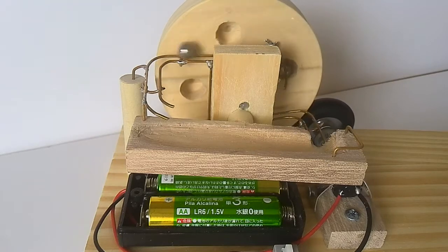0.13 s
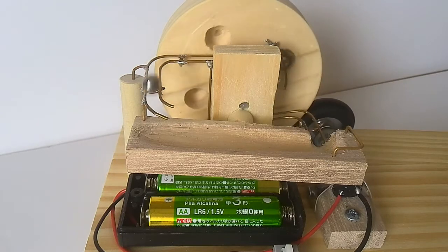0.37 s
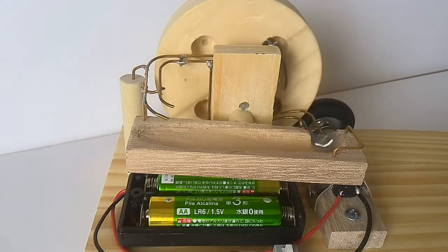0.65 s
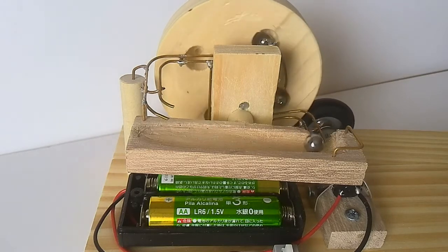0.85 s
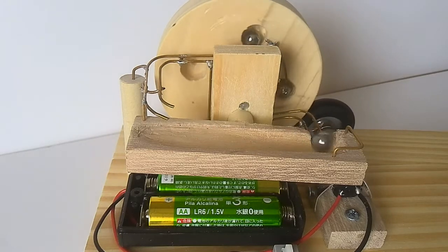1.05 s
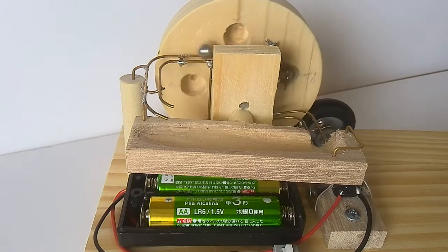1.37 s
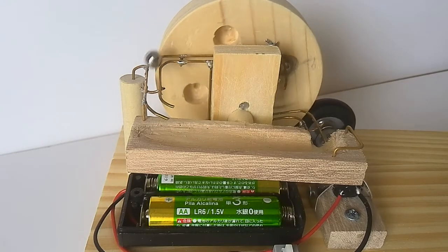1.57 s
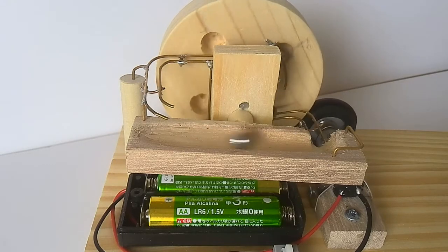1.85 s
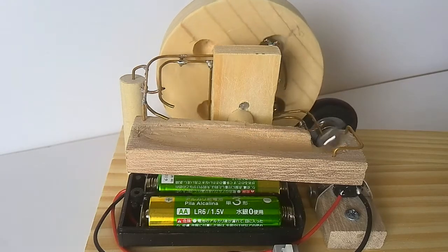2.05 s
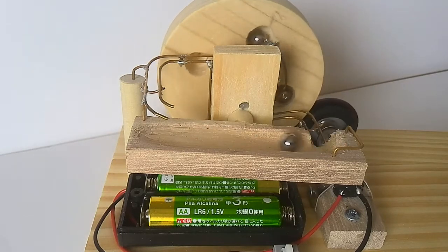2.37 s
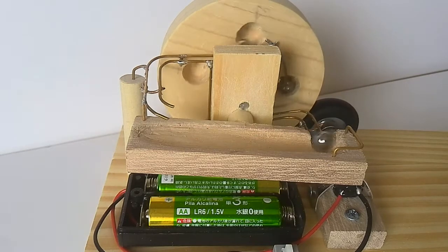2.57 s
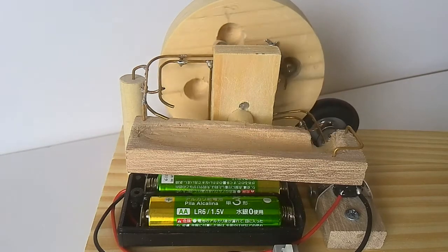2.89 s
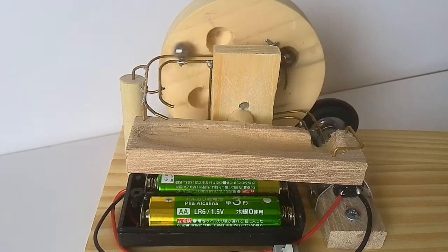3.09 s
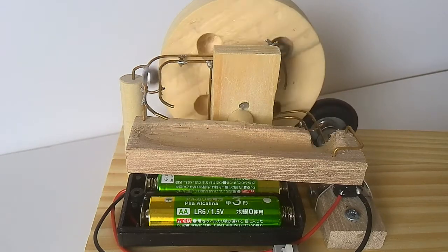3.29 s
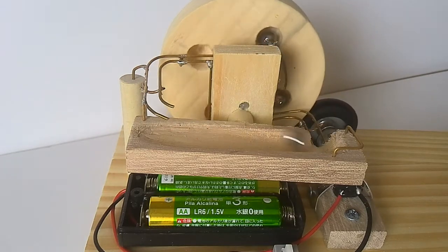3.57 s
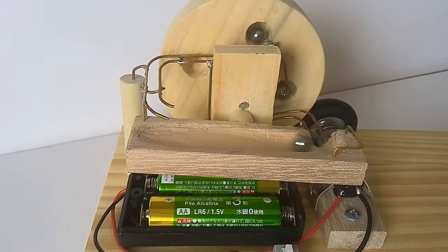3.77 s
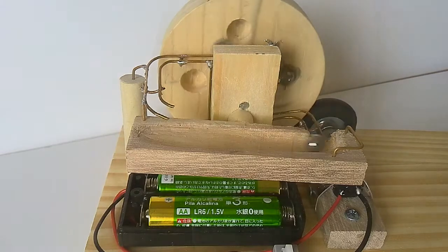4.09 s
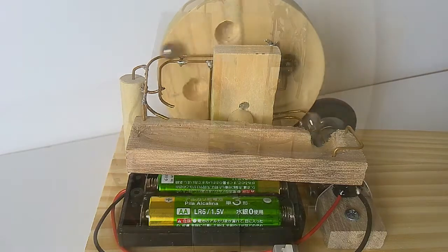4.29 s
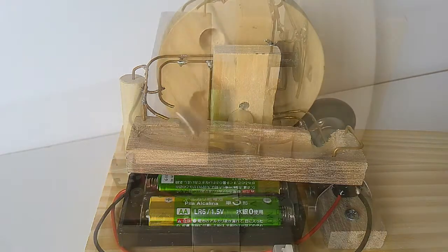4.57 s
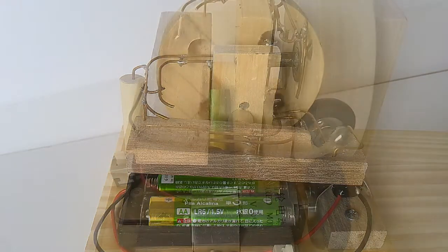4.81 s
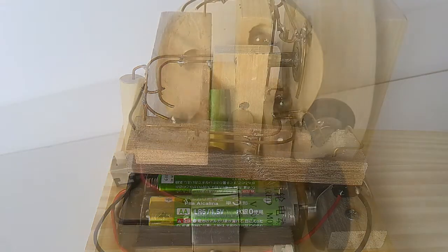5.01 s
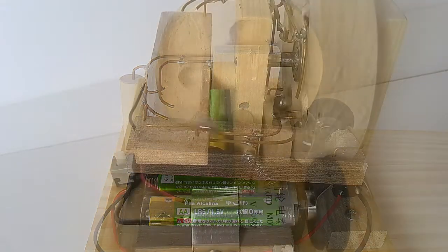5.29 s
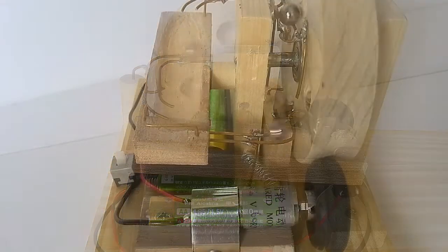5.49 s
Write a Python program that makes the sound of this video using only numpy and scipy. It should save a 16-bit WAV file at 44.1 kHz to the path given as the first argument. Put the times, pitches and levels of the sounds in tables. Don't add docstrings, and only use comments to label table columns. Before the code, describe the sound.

Over low room tone and a steady high motor hiss with faint gear whirr, metal balls make dry wooden ticks, clacks and tinny wire rattles, lap after lap. Faint rolling joins the knocks. Strong hits fall about one and a half, two, three, three and a half and four seconds in, then busy clattering to the end. Close stereo pickup, brighter on the left, little echo.

```python
import sys
import numpy as np
from scipy import signal
from scipy.fft import rfft, irfft, next_fast_len
from scipy.io import wavfile
from scipy.ndimage import uniform_filter1d, map_coordinates

SR = 44100
rng = np.random.default_rng(int(sys.argv[2]) if len(sys.argv) > 2 else 0)


def elevation(decibels):
    levels = np.asarray(decibels, float)
    return 10 ** (levels / 20)


def store_pcm(level_fs):
    pcm = np.round(np.clip(level_fs, -1, 1) * 32767).astype(np.int16)
    wavfile.write(sys.argv[1], SR, np.atleast_2d(pcm).T)


N = 249165

# f/Hz, level per Hz/dB
ROOM_TONE = [(9, -54), (15, -4.5), (60, -20), (100, -12.5), (210, -19.5), (270, -18), (340, -19),
             (430, -27.5), (680, -38.5), (800, -29), (1900, -28.5), (3000, -21), (3900, -29), (6600, -120)]
# f/Hz, left-right likeness/1
COHERENCE = [(60, .999), (100, 0.92), (150, 1), (400, 0.045), (1500, 0.063), (3000, 0.029)]
# f/Hz, width/Hz, level/dB
DISTANT_DRONE = [(34.8, 8, -61), (53.4, 5.4, -64)]
# f/Hz, t60/s
REVERBERATION = [(500, 0.21), (2500, 0.079), (8000, 0.047)]

# f/Hz, level/dB
STEADY_SHADE = [(200, 2.5), (1000, -0.5), (2500, 6), (4500, 1.5), (8000, 10), (10000, 15), (14000, 13)]
# f/Hz, level/dB
WOOD_SHADOW = [(900, 5), (1300, 6), (1800, 0), (2550, 5), (3400, 5), (4200, 10), (5000, 7), (6500, 11)]
# f/Hz, level/dB
RAIL_SHADOW = [(1000, 1), (2500, 2), (3700, 4), (5800, 5), (6800, 15), (10000, 17), (13000, 12)]

# t/s, level/dB
MOTOR_LOAD = [(0.0, -43), (0.83, -44.5), (1.05, -42), (1.64, -43.5), (2.47, -43), (2.97, -44), (3.9, -43),
              (4.28, -43.5), (5.11, -42.5), (5.44, -40.5), (5.65, -38.5)]
# f/Hz, width/Hz, level/dB
CAN_PEAKS = [(8590, 212, 3), (8750, 74, -2), (9150, 230, 2.5), (9580, 170, 2), (9990, 260, 3.5),
             (10500, 90, -1), (10334, 100, 4), (11440, 140, -2.5), (11910, 80, 1), (12170, 88, -4),
             (8870, 61, 2.5), (12350, 280, -5), (13830, 150, -8.5), (7460, 290, -13)]
# f/Hz, width/Hz, level/dB
GEAR_PEAKS = [(2970, 95, 1), (5040, 170, 4.5), (3790, 540, -4.5), (5510, 590, 3), (5130, 130, -2.5),
              (6640, 110, -24)]
# t/s, level/dB
LATE_HISS = [
    (0, -85.5),
    (4.3, -79),
    (4.55, -53),
    (4.9, -45),
    (5.3, -42.5),
    (5.65, -45),
]
# f/Hz, width/Hz, level/dB
LATE_HISS_PEAKS = [(8200, 420, -3), (8750, 240, -16.5), (10300, 310, 2), (10750, 260, -0.5),
                   (10800, 190, -3), (12000, 400, -3)]

# t/s, level/dB, attack/s, hold/s, t60/s
DRAGS = [
    (.443, -45, .01, .06, .2),
    (.07, -58, .02, .06, .2),
]
# f/Hz, level per Hz/dB
TABLE_TOP = [(90, -30), (150, -13), (220, -15), (480, -10), (1000, -9), (2500, -17), (4000, -24),
             (6000, -60)]
# f/Hz, width/Hz, level/dB
TABLE_BENDING = [(328, 53, -1)]

# from t/s, to t/s, level/dB
WOOD_ROLLS = [
    (-.1, .42, -60.5),
    (.62, 1.1, -64.5),
    (1.2, 2.27, -60),
    (2.6, 3.85, -65),
    (4.22, 4.6, -59.5),
    (4.6, 5.0, -56.5),
    (5.0, 5.7, -58.5),
]
# from t/s, to t/s, level/dB
RAIL_SLIDES = [
    (-.1, .42, -58.5),
    (.42, .6, -55),
    (1.2, 2.0, -57),
    (2.3, 3.0, -60.5),
    (3.1, 4.2, -59.5),
    (4.3, 4.9, -54.5),
    (4.9, 5.7, -57.5),
]
# t/s, level/dB, t60/s
SKITTERS = [(.07, -58, 0.29), (0.767, -32, 0.02), (.96, -58, 0.065), (1.261, -53, 0.11), (2.055, -52, 0.13),
            (2.19, -49.5, 0.075), (2.631, -46, 0.38), (3.051, -53, 0.41), (3.715, -44.5, 0.1),
            (4.831, -50, 0.17), (4.935, -45, 0.074), (5.282, -51, 0.33), (5.499, -61, 0.69)]

# f/Hz, level/dB, t60/s
BASE_MODES = [(1342, 4.5, .0057), (1509, -19, .024), (1025, -15, .02), (1652, -18, .02), (3350, -3, .005)]
# f/Hz, level/dB, t60/s
WALL_MODES = [(2110, -16, .018), (2546, -14, .03), (2550, 3, .007), (2800, -15, .018), (3105, -10, .035),
              (3240, -13, .03), (3368, -11, .045)]
# f/Hz, level/dB, t60/s
WHEEL_MODES = [(4250, -1, .006), (4420, -1, .013), (3930, -17, .025), (5100, -7, .01)]
# f/Hz, level/dB, t60/s
GRAIN_MODES = [(5740, -16, 0.027), (5410, 12, 0.0044), (6560, -8, 0.05)]
# f/Hz, level/dB, t60/s
FRAME_MODES = [(1600, 0, 0.0049), (2066, -6, 0.03), (2620, 6, 0.0065), (3150, 0, .02)]
# f/Hz, level/dB, t60/s
CRACK_MODES = [(1200, -8, .003), (2000, -4, .003), (2900, -3, .003), (3800, -3, .0035)]
# f/Hz, level/dB, t60/s
CAVITY_MODES = [(875, -1, .05), (800, -2, .007)]
# f/Hz, level/dB, t60/s
THUMP_MODES = [(159.5, 12.5, 0.083), (327, 20.5, 0.019), (442, 14, 0.02)]
# f/Hz, level/dB, t60/s
SHORT_SPANS = [(6180, -15, 0.038), (6715, -10, 0.034), (7166, -4, 0.025), (7560, -4, 0.0091),
               (7800, -24, 0.008), (8794, -13, 0.035), (9520, -14, 0.021), (10140, -14, 0.014)]
# f/Hz, level/dB, t60/s
LONG_SPANS = [(3070, -11, .026), (3370, -6, .045), (3892, -6, .045), (4370, -2, .02), (4860, -4, .024),
              (5500, -8, .016), (2300, -14, .016), (1500, -14, .014)]
# f/Hz, level/dB, t60/s
BALL_MODES = [(10470, 2, 0.013), (11570, 8.5, 0.0052), (13330, 0, 0.012)]

# t/s, level/dB, hardness/dB
BASE_THUDS = [(0.063, -32.5, -24), (0.0865, -32, -29), (0.0974, -30.5, -8), (0.803, -39, -10),
              (1.2754, -29.5, -8), (1.3528, -34, -18), (1.5673, -33, -1), (1.631, -24, -10),
              (2.6305, -27.5, -9), (2.683, -37, -17), (2.694, -40, -20), (2.7118, -33.5, -17),
              (2.7251, -38, -20), (3.126, -22, -1.5), (3.1585, -44, -15), (3.684, -45, -5),
              (3.7048, -39, -6), (3.712, -38, -15), (3.75, -47, 1), (3.717, -43, -15), (4.6872, -23.5, 0),
              (4.7094, -30, -18), (5.4299, -37.5, -29), (5.4985, -25, -10), (.876, -41, -10),
              (1.655, -46, -22), (2.194, -53, 0), (2.65, -28, -16), (2.983, -40.5, -24), (5.013, -42, -18),
              (5.168, -47, -10), (5.282, -30.5, -8), (5.296, -32, -8), (0.396, -39, -29), (0.418, -38, -20),
              (0.844, -57, -12), (1.975, -44.5, -12), (1.987, -50, -12), (3.327, -43, -25),
              (4.945, -51, -15), (4.885, -47, -14), (4.49, -46, -19), (0.454, -52, -30), (0.468, -44, -24),
              (.508, -30, -6), (0.534, -39, -10), (2.6765, -42, -10), (2.757, -43, -12), (5.511, -37, -12),
              (5.525, -33, -10), (5.5472, -37, -14), (5.557, -36.5, -14), (5.573, -36, -17),
              (5.5864, -39, -14)]
# t/s, level/dB, push into the base/dB, hardness/dB
TROUGH_TAPS = [(.608, -22.5, 0, -17), (.628, -33, -3, -7), (0.7549, -26, -10, -0.5), (.763, -22, -10, -34),
               (0.7718, -44, -6, -22), (1.077, -45.5, -3, -14), (1.9182, -51, 3, -10), (3.555, -42, 4, -8),
               (0.888, -36.5, -6, -18), (0.9548, -32.5, -8.5, -23), (0.964, -44.5, -2, -19),
               (1.04, -39, -13, -3), (1.9106, -19, -5.5, -1.5), (1.953, -37.5, 2, -22),
               (2.0543, -49, 3, -7), (2.057, -33.5, -15, -21), (2.0691, -42, -9, -8),
               (2.0767, -36.5, -5.5, -4), (2.1086, -44, 2, -13), (2.1863, -29, -15, -6),
               (2.221, -28, -15, -34), (3.5457, -16, -8, -1.5), (3.5903, -37, 2.5, -18),
               (3.8068, -34, -4.5, -6), (4.282, -34.5, -13, -8), (4.6918, -18, -5.5, -14),
               (4.8364, -24.5, -19, -25), (4.85, -25.5, -12, -8), (4.9309, -32.5, -9, -15),
               (4.8948, -38, -9, -22), (5.1712, -41, -12, -15), (5.184, -43, -26, -15),
               (4.9534, -38, -1, -21), (5.076, -38, -8, -12), (5.0895, -45, 1, -16), (5.125, -37, -31, -5),
               (5.4725, -37, -7, -22)]
# t/s, level/dB, push into the frame/dB
WHEEL_CLACKS = [(0.0224, -28.5, -6), (1.257, -36, -10), (1.5334, -38, -22), (1.5634, -27, -7),
                (1.59, -38, -4), (1.8377, -36, -24), (2.615, -43.5, -18), (2.6768, -45.5, -1),
                (3.03, -42, -25), (3.0506, -36, -10), (3.059, -24.5, -6), (3.084, -39, -10),
                (3.4575, -45, -13), (3.577, -47, -16), (4.3457, -40.5, -13), (4.6223, -24.5, -10),
                (4.629, -44, -6), (4.641, -38, -16), (4.6457, -43, 1), (4.829, -36.5, -21),
                (4.895, -43, -14), (5.518, -37, -20.5)]
# t/s, level/dB, long spans over short/dB
RAIL_CLINKS = [(0.1507, -33, 4.5), (0.1811, -35, -16), (0.5103, -33.5, -3), (1.2275, -30, -9),
               (1.2446, -21.5, -14.5), (1.2672, -26, -7.5), (1.2796, -37, 1), (1.2856, -30, -11),
               (1.464, -33.5, 2.5), (1.489, -32.5, -9), (1.498, -38, -7), (1.505, -36, -2),
               (1.571, -27.5, -10), (1.5751, -47, -13), (1.809, -36, -8), (1.8135, -33, -5),
               (1.82, -37, -4), (1.8224, -37, 2), (1.827, -38, 0), (1.84, -38, 3), (2.626, -29, -10),
               (2.6332, -33, -16), (2.6376, -30, -8), (2.645, -36, -6), (2.649, -31, -9),
               (2.6537, -31, -4), (2.6593, -30, -13), (2.667, -25, -20), (3.051, -34, -1),
               (3.0656, -32.5, 4), (3.17, -35, -3),
               (3.448, -30.5, -6), (3.474, -34.5, -6), (3.9948, -16.5, -6), (3.9974, -15, -5.5),
                (4.0142, -21, -9.5), (4.028, -35, -2.5), (4.232, -34.5, 4), (4.2366, -40, -12),
                (4.2704, -33, -3.5), (4.336, -36.5, -3), (4.3577, -33, -8), (4.4354, -37, -2),
                (4.59, -37, -5), (4.5924, -40, -9), (4.5957, -31, 0), (4.6, -36, -3), (4.6175, -28.5, -2),
                (4.861, -37, -11), (5.2817, -21, -12), (5.29, -21, -4.5), (5.295, -25, -18),
                (5.2994, -26.5, -2), (5.307, -36, -8), (5.3125, -25, -12), (5.3178, -37, -5),
                (5.325, -40, 0), (5.4863, -44, -7), (5.4925, -34, -12), (5.5033, -29, -6),
                (5.5144, -32, -4), (5.523, -33, -3), (5.528, -28, -4), (5.5764, -40, -12),
                (5.5837, -34, -8),
               (.002, -37.5, -4), (0.098, -42, -15), (.272, -36.5, -3), (0.3745, -38.5, -2.5),
                 (.444, -54, -30), (0.5068, -37, -3), (.5345, -37, 4.5), (1.2502, -33, 4), (1.258, -31, -2),
                 (2.61, -42, -9), (2.677, -41, -21), (2.747, -40, -12), (3.0305, -53, -8),
                 (3.082, -45, -22), (3.443, -38, -3), (3.4725, -37, 6), (4.021, -31, 5),
                 (4.3745, -35.5, -10), (4.655, -36, -6), (5.335, -42, -15), (5.537, -35, -7),
                 (5.56, -35.5, -10)]


def unit(x):
    return x / np.sqrt(np.mean(x ** 2) + 1e-20)


def along(points, hz):
    f, v = np.transpose(points)
    return np.interp(np.log(hz + 1), np.log(f + 1), v)


def curves(rows):
    s, *cols = np.transpose(rows)
    return [np.interp(np.arange(N) / SR, s, c, -120, c[-1]) for c in cols]


def spans(rows):
    t = np.arange(N) / SR
    ease_s = 0.013
    return sum(elevation(db) * np.clip(np.minimum(t - a, b - t) / ease_s + .5, 0, 1) for a, b, db in rows)


def wobble(rate):
    knots = rng.standard_normal(int(N * rate / SR) + 4)
    return map_coordinates(knots, [np.arange(N) * rate / SR])


def pair(alike):
    a, b = rng.standard_normal((2, N))
    u = np.arccos(np.clip(alike, 0, 1)) / 2
    return np.array([np.cos(u) * a + np.sin(u) * b, np.cos(u) * a - np.sin(u) * b])


def filtered(x, response):
    m = next_fast_len(N + 8192)
    return irfft(rfft(x, m) * response(np.fft.rfftfreq(m, 1 / SR)), m)[..., :N]


def resonant(peaks):
    def response(f):
        total = 0
        for k, (c, w, db) in enumerate(peaks):
            total = total + (-1) ** k * elevation(db) * 1j * f * w / (c * c - f * f + 1j * f * w)
        return total
    return response


def spread(peaks):
    return lambda hz: np.sqrt(sum(abs(resonant([peak])(hz)) ** 2 for peak in peaks))


def damped(modes, widen):
    return resonant([(hz, widen * np.log(1000) / np.pi / t60, db) for hz, db, t60 in modes])


def patchy(x, depth_db, size=14):
    z = signal.stft(x, nperseg=512)[2]
    field = uniform_filter1d(rng.standard_normal(z.shape[1:]), size=3, axis=0)
    field = uniform_filter1d(field, size=size, axis=1)
    return signal.istft(z * elevation(depth_db * unit(field)), nperseg=512)[1][:, :N]


def air():
    def mid_side(hz):
        turn = np.arccos(np.clip(along(COHERENCE, hz), 0, 1)) / 2
        return elevation(along(ROOM_TONE, hz)) * [np.cos(turn), np.sin(turn)]
    mid, side = filtered(rng.standard_normal((2, N)), mid_side)
    tone = elevation(-59.0) * unit(np.array([mid + side, mid - side]))
    for hz, width, db in DISTANT_DRONE:
        tone = tone + elevation(db) * unit(filtered(rng.standard_normal(N), resonant([(hz, width, 0)])))
    return tone


def room(x):
    wall_s = .005
    delay = round(wall_s * SR)
    out, step = np.zeros((2, N + SR)), SR // 8
    for start in range(0, N, step):
        hz, t, z = signal.stft(rng.standard_normal((2, SR // 6)), SR, nperseg=128)
        decay = elevation(-60 * t / along(REVERBERATION, hz)[:, None])
        tail = signal.istft(z * decay, SR, nperseg=128)[1]
        echo = signal.fftconvolve(x[None, start:start + step], tail / np.linalg.norm(tail[0]), axes=1)
        out[:, start + delay:][:, :echo.shape[1]] += echo
    return out[:, :N]


def scuff():
    t = np.arange(N) / SR
    stroke = 0
    for s, db, attack, hold, t60 in DRAGS:
        fade = elevation(db - 60 * np.clip(t - s - hold, 0, 1) / t60)
        stroke = stroke + np.clip((t - s) / attack, 0, 1) * fade
    rough = elevation(2.2 * wobble(250) + 1.2 * wobble(70)) * pair(.75)
    body = lambda hz: elevation(along(TABLE_TOP, hz)) + abs(resonant(TABLE_BENDING)(hz)) ** 2
    return stroke * unit(filtered(rough, body))


def motor():
    hiss_db, = curves(MOTOR_LOAD)
    late_db, = curves(LATE_HISS)
    shaft = np.sin(2 * np.pi * np.cumsum(60 + 4 * wobble(4.2)) / SR)
    chatter = elevation(0.93 * shaft + 0.33 * wobble(400) + 0.81 * wobble(24.89) + 0.46 * wobble(2500))
    can = unit(patchy(filtered(chatter * pair(0.029), spread(CAN_PEAKS)), depth_db=1.34, size=90))
    late_hiss = unit(filtered(chatter * pair(0.52), lambda hz: spread(LATE_HISS_PEAKS)(hz) ** 1.4))
    gears = unit(patchy(filtered(chatter * pair(0.47), resonant(GEAR_PEAKS)), depth_db=3.0))
    whirr_db = -51 + 0.74 * (hiss_db - hiss_db.mean())
    return elevation(hiss_db + 0.14) * can + elevation(late_db) * late_hiss + elevation(whirr_db) * gears


def rolling():
    t = np.arange(N) / SR
    trails = sum(elevation(db - 60 * np.abs(t - s) / t60) * (t > s) for s, db, t60 in SKITTERS)
    bumps = lambda: elevation(3.9 * wobble(150) + 1.6 * wobble(33)) * pair(0.025)
    wood = unit(filtered(bumps(), damped(BASE_MODES + WALL_MODES, widen=3.6)))
    wire = filtered(bumps(), damped(SHORT_SPANS[1:3] + LONG_SPANS[:5], widen=2.7))
    wire = unit(patchy(wire, depth_db=3.0))
    return (spans(WOOD_ROLLS) + trails) * wood + spans(RAIL_SLIDES) * wire


def strikes(times, levels_db, modes, rise_s=0, scatter_db=1.7):
    damping = 1.2
    hz, db, t60 = np.transpose(modes)[:, :, None]
    out = np.zeros(N + SR)
    t = np.arange(min(int(t60.max() / damping * SR), SR // 10)) / SR
    shape = elevation(db - 60 * damping * t / t60) * (1 - np.exp(-t / (rise_s + 0.7 / hz)))
    detune = .012 + 5e-7 / t60 ** 2
    luck = rng.standard_normal((len(times), 3, len(modes), 1))
    for s, level_db, (size, tune, late) in zip(times, levels_db, luck):
        if level_db < -90:
            continue
        phase = 2 * np.pi * hz * ((1 + detune * tune) * t + rise_s * late)
        ring = shape * elevation(scatter_db * size) * np.sin(phase)
        out[max(round(s * SR), 0):][:len(t)] += elevation(level_db) * ring.sum(0)
    return out[:N]


def knocks():
    off = -120
    rows = []
    for s, db, hard in BASE_THUDS:
        rows.append((s, db, db - 40, db + hard - 3.5, db + hard - 12, off, db - 26))
    for s, db, base, hard in TROUGH_TAPS:
        rows.append((s, db + base - 5.5, db, db + hard, db + hard - 5.5, off, db + base - 7.5))
    for s, db, frame in WHEEL_CLACKS:
        rows.append((s, db - 27, db + frame - 10, db, db - 8, db + frame, off))
    return np.transpose(rows)


def wooden(s, base_db, walls_db, wheel_db, grain_db, frame_db):
    parts = ((base_db, BASE_MODES), (walls_db, WALL_MODES), (wheel_db, WHEEL_MODES),
             (grain_db, GRAIN_MODES), (frame_db, FRAME_MODES))
    wood = sum(strikes(s, db + 3.5, modes) for db, modes in parts)
    wood += strikes(s, (np.maximum(walls_db, frame_db) + wheel_db) / 2 + 8.0, CRACK_MODES)
    return signal.sosfilt(signal.butter(N=4, Wn=5560, fs=SR, output="sos"), wood)


def rails():
    s, db, long_db = np.transpose(RAIL_CLINKS)
    parts = ((3.0, SHORT_SPANS), (long_db + 0.5, LONG_SPANS), (-8.0, BALL_MODES))
    return sum(strikes(s, db + gain_db, modes, rise_s=.0007, scatter_db=2.5) for gain_db, modes in parts)


def balls():
    blows = knocks()
    s, base_db, walls_db, air_db = blows[[0, 1, 2, -1]]
    clacks = len(WHEEL_CLACKS)
    wood = wooden(*blows[:-1, :-clacks])
    wheel = wooden(*blows[:-1, -clacks:]) * elevation(1.5)
    trough = strikes(s, air_db, CAVITY_MODES)
    trough = trough + strikes(s, 0.36 * base_db + 0.27 * walls_db - 40.0, THUMP_MODES)
    wire = rails()
    wood, wire = wood * elevation(1.2 * wobble(900)), wire * elevation(1.2 * wobble(900))
    small_body = signal.butter(N=4, Wn=1074, btype="high", fs=SR, output="sos")
    wood, wheel, wire = signal.sosfilt(small_body, [wood, wheel, wire])
    return wood, wheel, trough, wire


def scene():
    side = np.array([[.5], [-.5]])

    def heard(x, shade, lag_s):
        return filtered(x, lambda hz: elevation(side * along(shade, hz)) * np.exp(2j * np.pi * hz * side * lag_s))

    wood, wheel, trough, wire = balls()
    width_s, wheel_s, rails_s = 0.00013, 0.00002, 0.00007
    steady = elevation(-9.5) * room(wood + wheel + trough + wire) + motor() + rolling() + scuff()
    hits = heard(wood, WOOD_SHADOW, width_s) + heard(wheel, WOOD_SHADOW, wheel_s)
    hits = hits + heard(wire, RAIL_SHADOW, rails_s)
    leaning = elevation(side * 4.5) * trough
    return hits + leaning + heard(steady, STEADY_SHADE, width_s) + air()


def top_cut(x):
    return signal.sosfilt(signal.butter(12, 14270, fs=SR, output="sos"), x)


def record(dry):
    mix = dry + .0009
    return top_cut(mix)


dry = scene()
out = record(dry)
store_pcm(out)
```